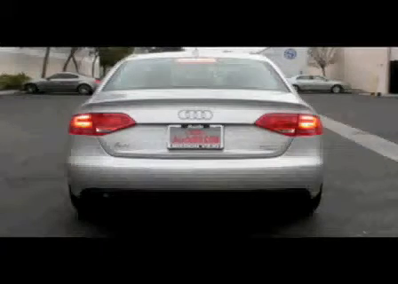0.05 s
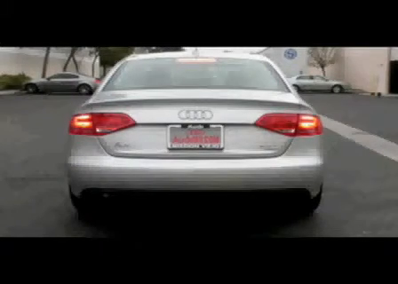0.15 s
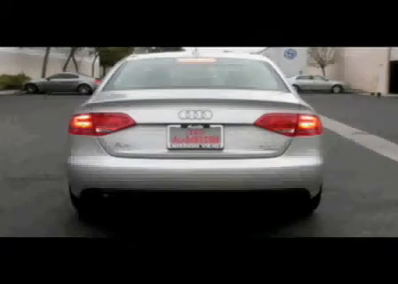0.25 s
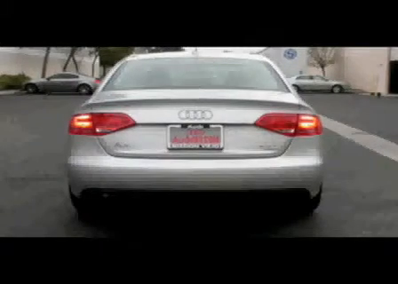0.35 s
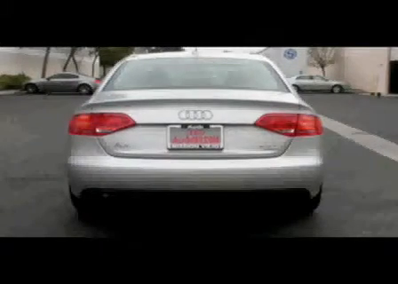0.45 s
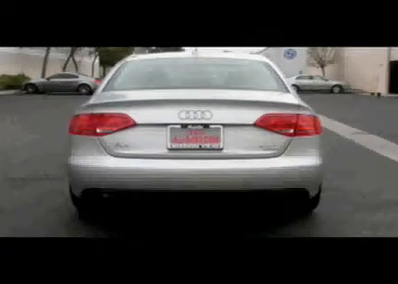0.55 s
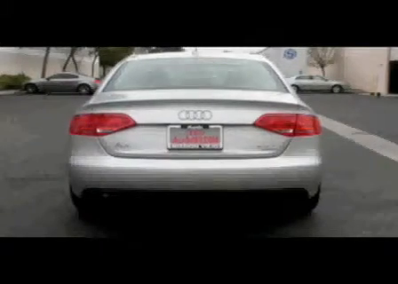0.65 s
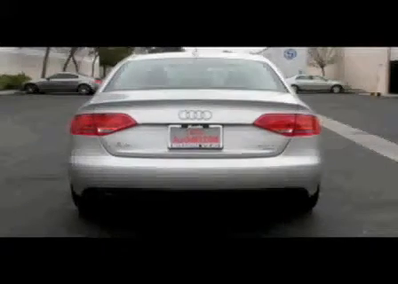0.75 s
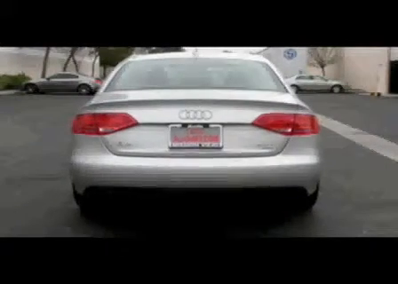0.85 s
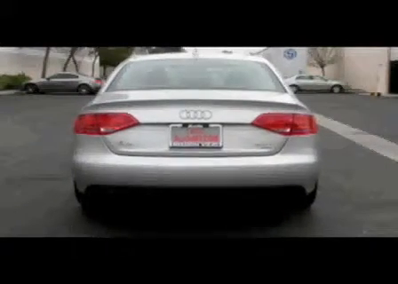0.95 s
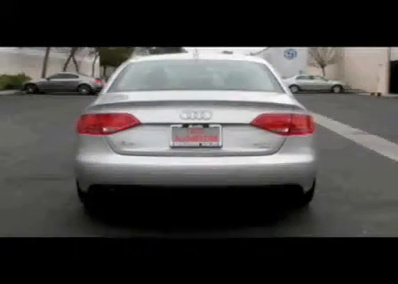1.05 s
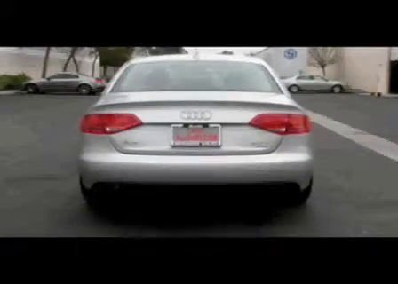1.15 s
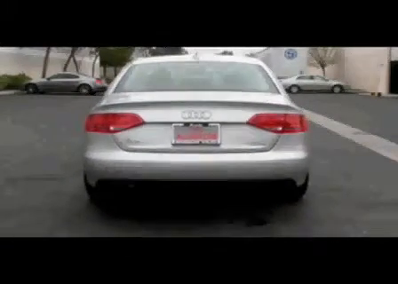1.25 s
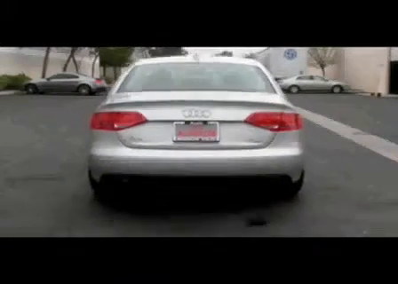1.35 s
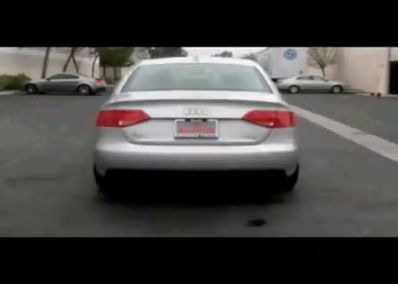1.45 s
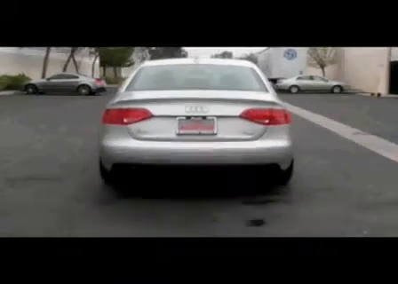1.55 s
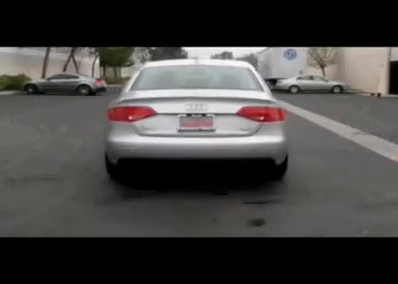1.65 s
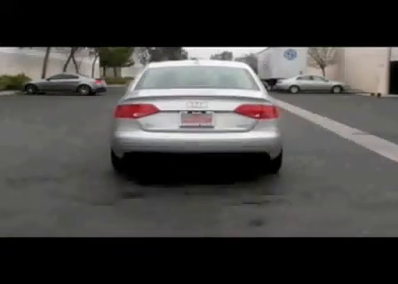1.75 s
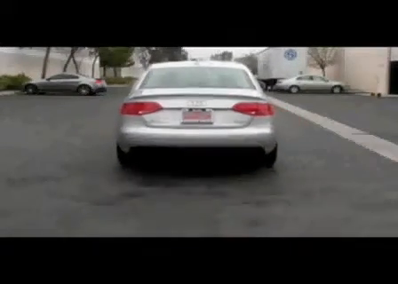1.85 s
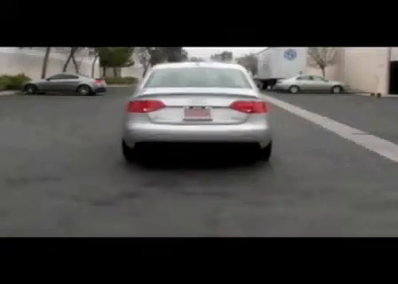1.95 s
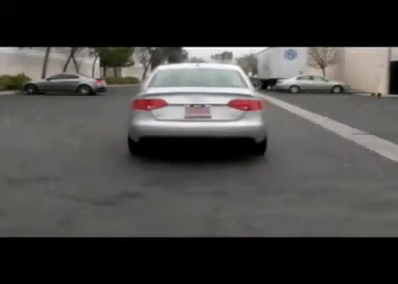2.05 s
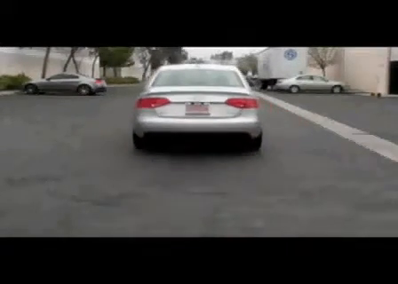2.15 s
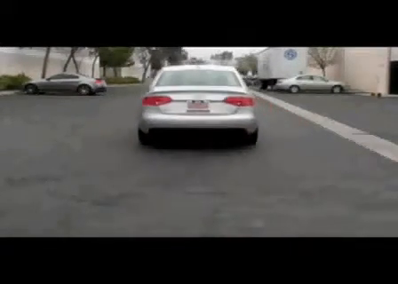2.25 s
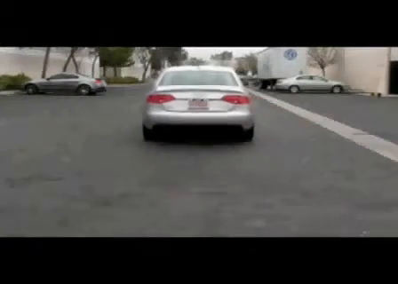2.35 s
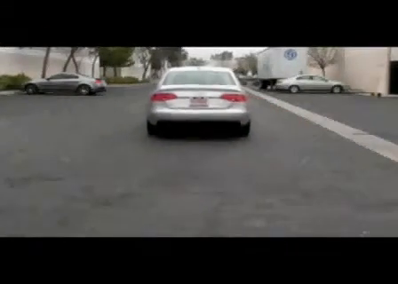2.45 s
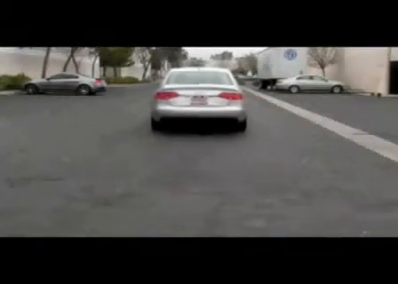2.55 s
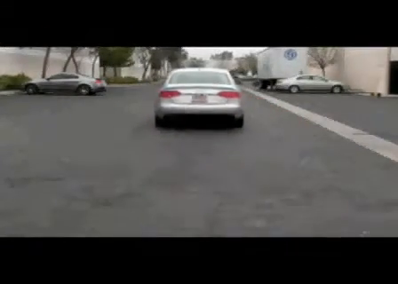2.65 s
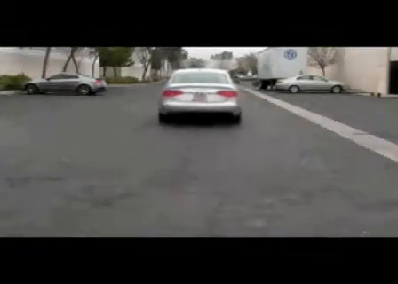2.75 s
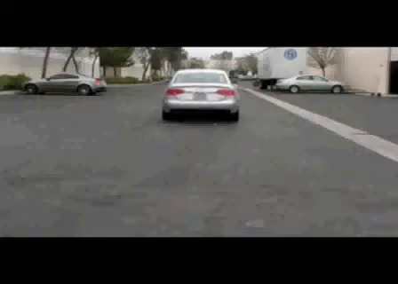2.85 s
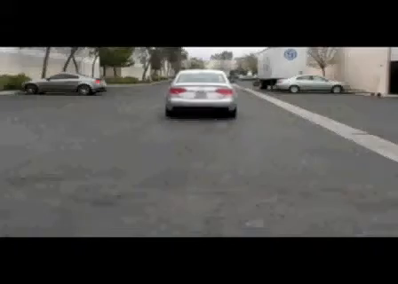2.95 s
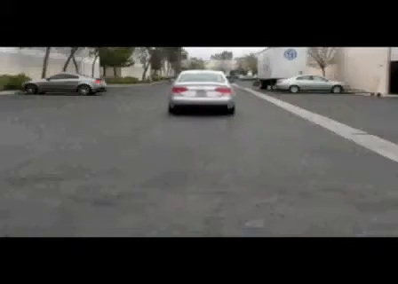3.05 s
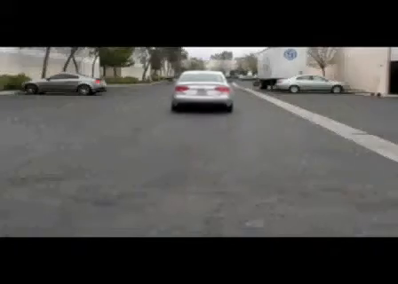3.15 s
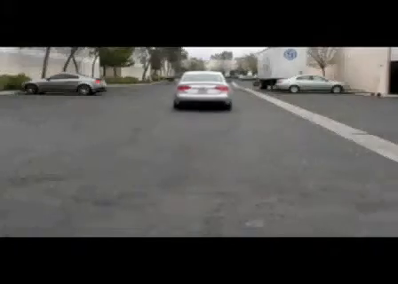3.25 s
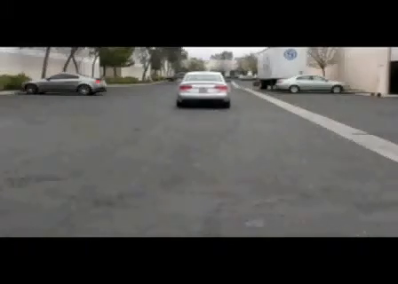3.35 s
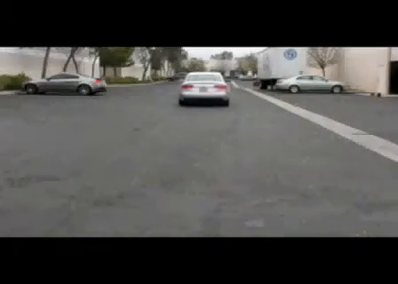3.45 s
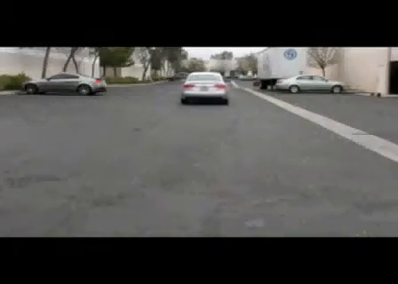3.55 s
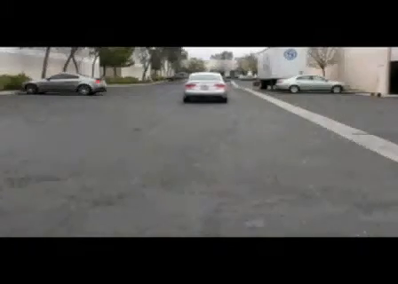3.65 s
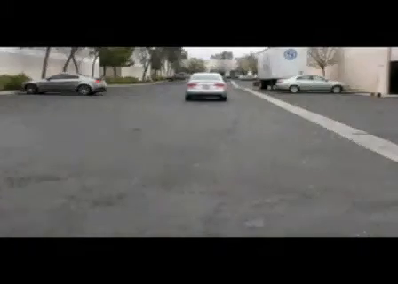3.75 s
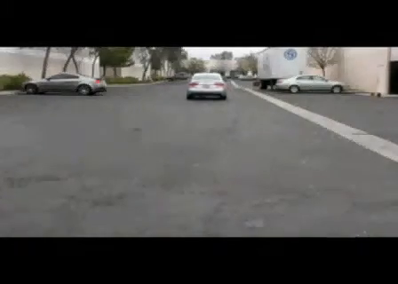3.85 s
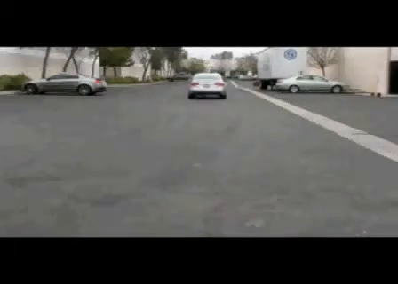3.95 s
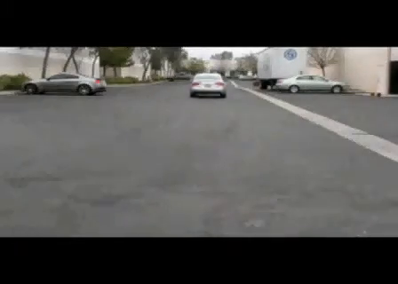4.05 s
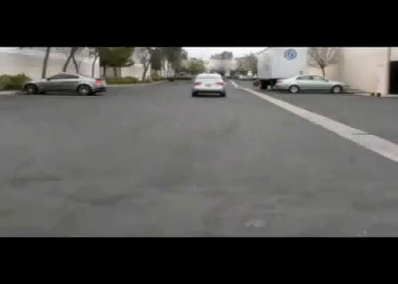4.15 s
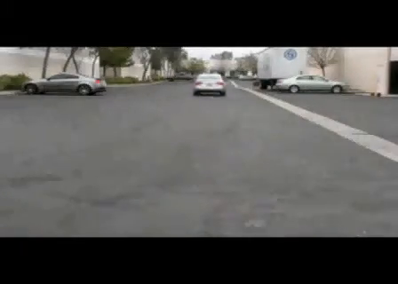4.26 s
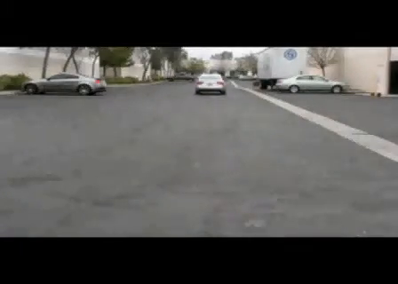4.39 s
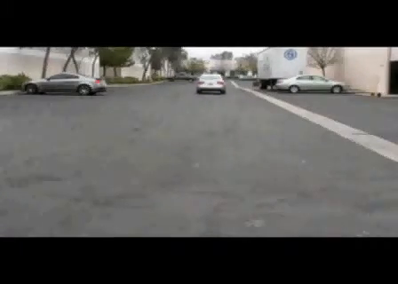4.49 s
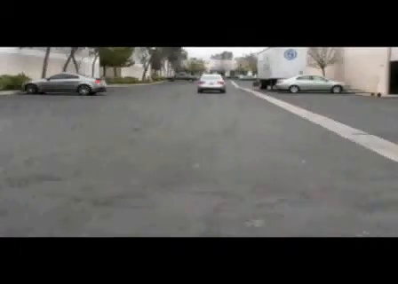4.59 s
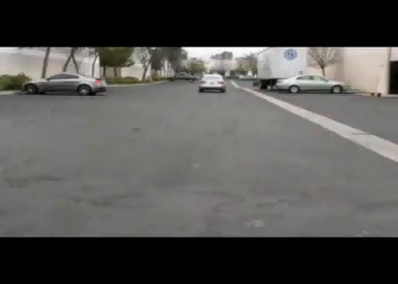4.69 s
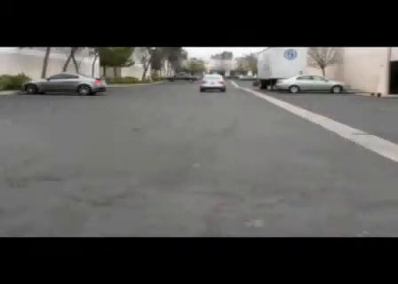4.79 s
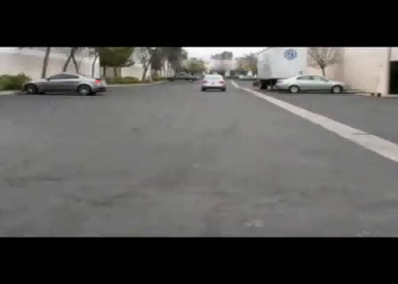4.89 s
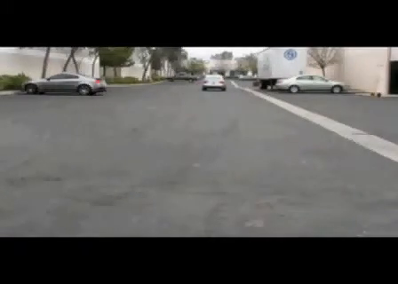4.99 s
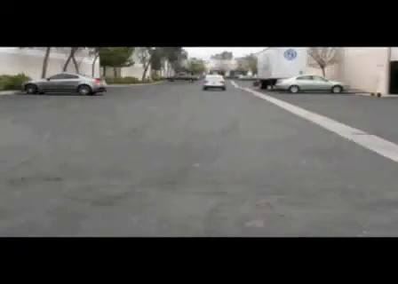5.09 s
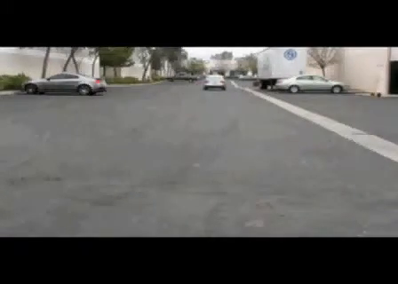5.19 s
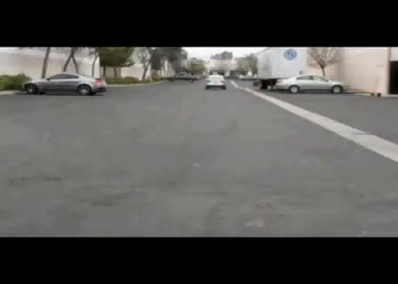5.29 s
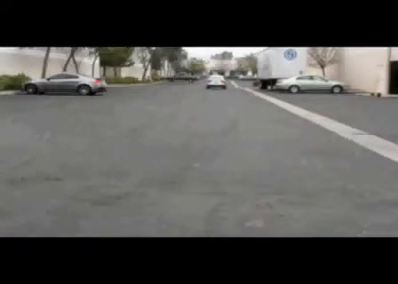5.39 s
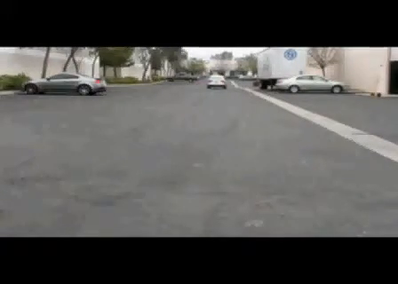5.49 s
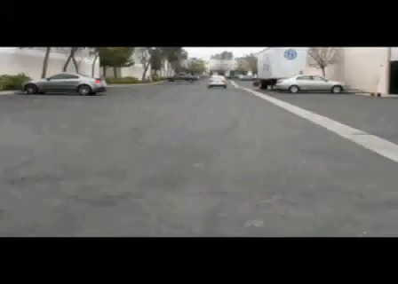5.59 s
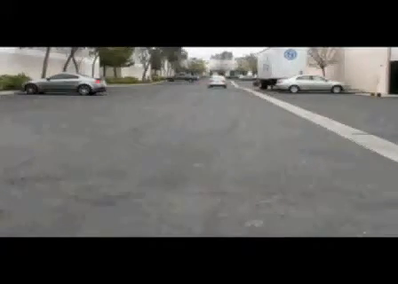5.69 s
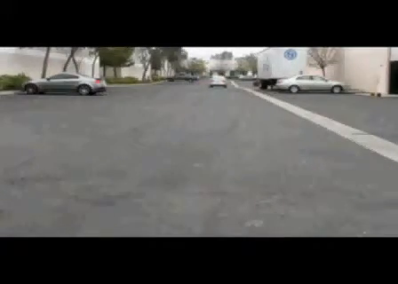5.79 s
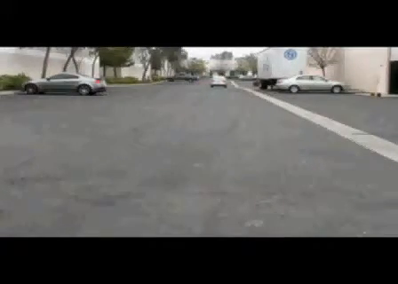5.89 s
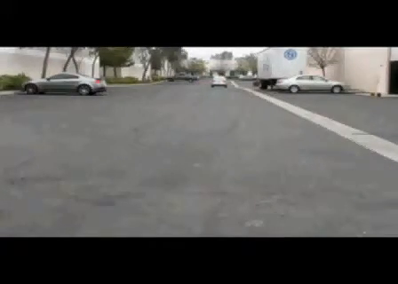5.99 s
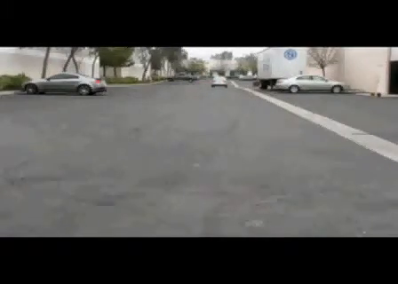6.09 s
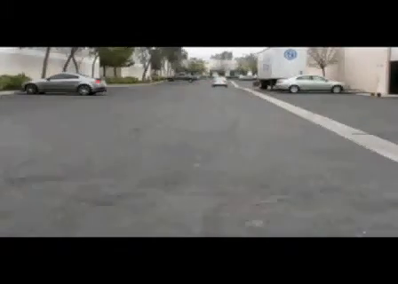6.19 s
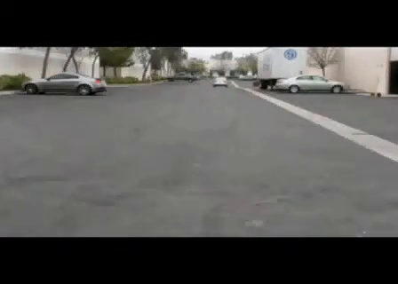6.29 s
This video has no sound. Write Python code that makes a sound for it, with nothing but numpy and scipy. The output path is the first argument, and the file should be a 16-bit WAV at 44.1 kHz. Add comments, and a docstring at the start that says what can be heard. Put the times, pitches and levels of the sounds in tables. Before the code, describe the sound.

Deep exhaust boom climbs from a soft idle to a loud drone, crackles at the gear change, then drops lower and fades away.

```python
"""Sports exhaust pulling away

A four-cylinder car idles just ahead, pulls away, burbles through an upshift and accelerates off down
a street between warehouses. Firing pulses boom as partials shaped by the tailpipe; noise in puffs is
exhaust gas, with a rasp each crank turn; even noise is tyre roll; a turbo whistles, unburnt fuel bangs,
walls return a diffuse echo. Rounding to coarse steps adds a gritty hiss."""
import sys
import numpy as np
from scipy import signal
from scipy.fft import rfft, irfft, next_fast_len
from scipy.io import wavfile

SR = 44100
rng = np.random.default_rng(int(sys.argv[2]) if len(sys.argv) > 2 else 0)


def persist_wave(psi):
    """Save psi, clipped to +-1, as 16-bit WAV."""
    counts = np.round(np.clip(psi, -1, 1) * 32767).astype(np.int16)
    wavfile.write(sys.argv[1], SR, np.atleast_2d(counts).T)


N = 279250
TIME = np.arange(N) / SR

# Engine speed at idle, lifting as the brake is let go. Each row: time in seconds, firing rate in Hz.
IDLE_FIRING_HZ = [(0, 27.63), (.48, 27.86), (.6, 31.37), (.66, 31.17)]
# Engine speed in first gear. Each row: time in seconds, firing rate in Hz.
FIRST_GEAR_FIRING_HZ = [(0.7, 42.8), (0.81, 52.5), (0.88, 58.1), (1.07, 64.43), (1.53, 75.47), (1.92, 90.9),
                        (2.31, 115.6), (2.83, 153.2), (3.3, 181.9), (3.73, 199.1), (3.87, 199.1)]
# Engine speed in second gear. Each row: time in seconds, firing rate in Hz.
SECOND_GEAR_FIRING_HZ = [(4.25, 125.4), (4.6, 137.9), (5.3, 149.6), (6.33, 167.6)]
# Firing pulse strength, throttle and distance together, before the pipe and trims.
# Each row: time in seconds, level in dB.
DRIVE_DB = [(0, -41), (.45, -37.5), (.55, -40), (.7, -34.5), (.95, -30.5), (1.65, -31), (2.35, -26),
            (2.6, -27), (2.97, -24), (3.12, -28.5), (3.7, -26.5), (4.15, -29.5), (4.27, -46), (4.55, -41.5),
            (4.83, -29.5), (5.35, -35), (6.02, -36.5), (6.33, -41)]
# What the pipe and muffler pass. Each row: frequency in Hz, gain in dB.
PIPE_DB = [(28, -10.5), (45, -6), (58, -3), (85, 0), (130, 0), (160, -3), (200, -7.5), (240, -5.5),
           (285, -9.5), (325, -12), (360, -12), (376, -14.5), (396, -21), (450, -16), (560, -25),
           (1000, -38)]
# Wall echoes cancel the firing note. Each row: time in seconds, gain change in dB, half length in seconds.
NULLS = [(3.138, -4, .02), (3.49, -12.5, .022), (3.642, -13, 0.019), (3.797, -20, .045),
         (3.974, -10.5, .017), (4.279, -9.5, .04), (5.199, -6, .05), (5.592, -17, 0.049),
         (5.891, -10, 0.046), (6.145, -10, 0.045)]
# Cylinder inequality: even at the launch, rough under load; before the upshift and lope trims.
# Each row: firing rate in Hz, half-order level in dB.
UNEVEN_DB = [(28, -27), (58, -28.5), (95, -19.5), (150, -14)]
# Overtone loss: pulses soften as the clutch bites, sharpen under load.
# Each row: firing rate in Hz, loss from one overtone to the next in dB.
OVERTONE_FALL_DB = [(28, 3), (52, 7), (72, 1.8), (110, 4.5)]
# Rush of gas and tyres, before trims and thresholds.
# Each row: time in seconds, roar level in dB, sharp hiss level in dB.
RUSH_DB = [(0, -64, -64.5), (.58, -63.5, -64.5), (.86, -50.5, -58), (1.27, -50, -57), (1.87, -43, -54),
           (2.22, -36, -49), (2.5, -34, -48), (3.0, -36.5, -47), (3.17, -38, -49), (3.84, -40, -49.5),
           (4.18, -42.5, -55), (4.42, -46.5, -57), (4.69, -42.5, -55.5), (6.02, -44, -53.5),
           (6.33, -46, -56.5)]
# Share of the rush from tyres and far walls. Each row: time in seconds, share 0-1.
FAR_SHARE = [(0, 0), (1.8, 0.22), (2.7, 0.19), (3.6, 0.62), (4.1, .5), (4.35, .9), (6.33, 0.96)]
# Gas roar spectrum. Each row: frequency in Hz, relative density in dB per Hz.
GAS_COLOUR = [(30, -28), (80, -12), (200, -1), (330, 2.5), (450, -1), (660, 1.5), (900, -2), (1250, -4),
              (1800, -11.5), (2600, -22), (5000, -43.5)]
# Sharp hiss spectrum. Each row: frequency in Hz, relative density in dB per Hz.
HISS_COLOUR = [(700, -26), (1500, -0.5), (2200, -2), (3500, -4), (5000, -11), (6500, -17), (8000, -20),
               (14000, -36)]
# Tyre roll spectrum. Each row: frequency in Hz, relative density in dB per Hz.
TYRE_COLOUR = [(30, -20.5), (80, -5.5), (200, -1), (350, -.5), (500, -3), (700, -1.5), (900, 2), (1150, -2),
               (1500, -5), (2000, -10), (3000, -22.5), (6000, -49)]
# Quiet street spectrum. Each row: frequency in Hz, relative density in dB per Hz.
STREET_COLOUR = [(30, 0.5), (120, -3), (300, -8.5), (1000, -15.5), (3000, -24.5), (12000, -39.5)]
# Sharp bangs in the pipe. Each row: time in seconds, push level in dB before the pipe-end high-pass.
POPS = [(2.213, -17), (3.920, -19), (3.941, -25.5), (4.12, -19.5), (4.132, -23.5), (4.161, -24),
        (4.174, -19.5), (4.219, -31.5), (4.325, -32)]

SHIFT_START_S, SHIFT_END_S = 3.94, 4.18  # the spark is held back between these
SHIFT_ATTACK_S, SHIFT_RELEASE_S = .012, .077
TURBO_PER_FIRING, TURBO_TOP_HZ = 53, 6080  # whistle cycles per firing; pitch at full boost
STEP, TOP_HZ = .0055, 15900  # rounding step in full-scale units; upper band limit


def undb(db):
    """Decibels to gain."""
    return np.exp(np.asarray(db) * (np.log(10) / 20))


def curves(table):
    """Each column of a timed table, sample by sample."""
    s, *columns = np.transpose(table)
    return [np.interp(TIME, s, column) for column in columns]


def unit(x):
    """Scale to rms 1."""
    return x / np.sqrt(np.mean(x ** 2))


def noise(colour):
    """Noise of rms 1 with a spectrum given in Hz and dB."""
    hz, db = np.transpose(colour)
    size = next_fast_len(N, True)
    bins_hz = np.maximum(np.arange(size // 2 + 1) * SR / size, 1)
    shape = undb(np.interp(np.log(bins_hz), np.log(hz), db))
    return unit(irfft(rfft(rng.standard_normal(size)) * shape, size)[:N])


def wander(rate_hz):
    """Random curve of rms 1 that glides to a new value twice a cycle of the given rate."""
    values = rng.standard_normal(size=8192)
    return unit(np.interp(TIME * 2 * rate_hz, np.arange(len(values)), values))


def bump(s, half_s):
    """A smooth bump of height 1 around a moment."""
    return np.exp(-((TIME - s) / half_s) ** 2)


def around(s):
    """The samples within 50 ms of a moment."""
    return slice(int((s - .05) * SR), int((s + .05) * SR))


def remoteness():
    """Share of the sound that has come a long way, 0-1."""
    return np.clip(curves(FAR_SHARE)[0], 0, 1)


def upshift():
    """How far the spark is held back, 0-1: a quick onset, a hold and a release."""
    onset = np.minimum(TIME - SHIFT_START_S, 0) / SHIFT_ATTACK_S
    release = np.maximum(TIME - SHIFT_END_S, 0) / SHIFT_RELEASE_S
    return np.exp(onset - release)


def pipe_db(hz):
    """Gain of the exhaust system at a frequency."""
    points_hz, db = np.transpose(PIPE_DB)
    return np.interp(np.log(hz), np.log(points_hz), db)


def pipe_lead(hz, mouth_hz=86, q=.7):
    """The open pipe radiates like a high-pass: low partials lead, so each puff swings up, down and up."""
    r = hz / mouth_hz
    return np.pi - np.arctan2(r / q, 1 - r ** 2)


def overtone_db(k, hz, third_db=-4, shift_db=8, rough_db=2.5):
    """Higher overtones are weaker; they roughen with the revs and rise when the spark comes late."""
    fall_db = (k - 3) * np.interp(hz, *np.transpose(OVERTONE_FALL_DB))
    return third_db - fall_db + shift_db * upshift() + rough_db * hz / hz.max() * wander(30)


def half_orders(hz, shift_db=11, lope_db=-11, shift_lope_db=1, fall_db=1, rough_db=2.5):
    """Unequal cylinders add lines halfway between the partials, raised in the upshift: (order, dB)."""
    held = upshift()
    db = np.interp(hz, *np.transpose(UNEVEN_DB)) + shift_db * held
    lines = [(.5, db + lope_db + shift_lope_db * held + rough_db * wander(15))]
    for k in range(1, 5):
        lines.append((k + .5, db - (k - 1) * fall_db + rough_db * wander(30)))
    return lines


def tailpipe(hz, turn, shift_db=4, far_db=-3, waver_db=.89, flutter_db=.8, octave_flutter_db=1.76,
             smear_rad=.9, cut_db=-3, misfire_db=-5, misfire_s=.015):
    """Firing pulses as a stack of partials that sweep through the resonances of the pipe."""
    far, held = remoteness(), upshift()
    # the steady note gives way during the upshift and when a charge bangs in the pipe instead
    misfires = np.max([bump(s, misfire_s) for s, _ in POPS], axis=0)
    drive_db = curves(DRIVE_DB)[0] + cut_db * held + misfire_db * misfires

    def partial(k, db):
        # far off, shifting wall echoes pull the upper partials out of step
        drift = smear_rad * far * min(k - 1, 2) * wander(4) if k > 1 else 0
        level = np.sqrt(2) * undb(drive_db + pipe_db(k * hz) + db)
        return level * np.cos(k * turn + pipe_lead(k * hz) + drift)

    echo_db = flutter_db * far * wander(9) + sum(db * bump(s, half_s) for s, db, half_s in NULLS)
    octave_db = shift_db * held + far * (far_db + octave_flutter_db * wander(8))
    tone = (partial(1, echo_db) + partial(2, octave_db)) * undb(waver_db * wander(25))
    for k in range(3, 12):
        tone += partial(k, overtone_db(k, hz) + far_db * far)
    for k, db in half_orders(hz):
        tone += partial(k, db)
    return tone


def rasp(turn, hz, centre_hz=630, octaves=.5, full_hz=105, flicker_hz=7):
    """The pipe rings each crank turn: closely packed, unsteady lines in one resonance, up with the revs."""
    out, pitch = np.zeros(N), np.log2(hz / centre_hz)
    for k in np.arange(6, 22) / 2:
        resonance = np.exp(-((pitch + np.log2(k)) / octaves) ** 2)
        out += resonance * wander(flicker_hz) * np.cos(k * turn + rng.uniform(0, 2 * np.pi))
    return out * np.minimum(hz / full_hz, 1)


def rush(turn, hz, gas_db=-1, tyre_db=1.5, rasp_db=-10, puff=.35, idle_puff=.9,
         flutter_db=1.08, surge_db=.81, roar_floor_db=-64, hiss_floor_db=-59):
    """Gas leaves in puffs, one a firing; with distance the even roll of the tyres takes over."""
    level_db, sharp_db = curves(RUSH_DB)
    far = remoteness()
    depth = puff + (idle_puff - puff) * (hz.min() / hz) ** 2  # slow puffs stand apart, fast ones merge
    puffs = (1 + depth * (1 - far) * np.cos(turn + .6)) * undb(flutter_db * wander(70))
    near_gain, far_gain = np.sqrt(1 - far) * unit(puffs), np.sqrt(far)

    roar = undb(gas_db) * near_gain * noise(GAS_COLOUR)
    roar += undb(tyre_db + surge_db * wander(5.4)) * far_gain * noise(TYRE_COLOUR)
    roar += undb(rasp_db) * np.sqrt(1 - far) * rasp(turn, hz)
    # roar and hiss need a fast flow: both die away below a threshold
    roar_gain = undb(level_db) / np.sqrt(1 + undb(2 * (roar_floor_db - level_db)))
    hiss_gain = undb(sharp_db) / np.sqrt(1 + undb(2 * (hiss_floor_db - sharp_db)) ** 2)
    return roar_gain * roar + hiss_gain * noise(HISS_COLOUR) * np.hypot(near_gain, far_gain)


def turbo(firing_hz, db=-26, far_db=-22, flicker_hz=330):
    """The turbo spools with the revs to full boost: a breathy whistle that follows the gas, mostly nearby."""
    whistle_hz = np.minimum(TURBO_PER_FIRING * firing_hz, TURBO_TOP_HZ)
    turn = 2 * np.pi * np.cumsum(whistle_hz) / SR
    gain = undb(curves(RUSH_DB)[0] + db + far_db * remoteness())
    return gain * (wander(flicker_hz) * np.cos(turn) + wander(flicker_hz) * np.sin(turn))


def walls(x, db=-19, t60_s=.6):
    """Warehouse fronts return a diffuse echo, stronger against the direct sound as the car recedes."""
    age = TIME[:SR]
    tail = rng.standard_normal(SR) * undb(-60 * age / t60_s) * (age > .03)
    return undb(db) * signal.fftconvolve(x * np.sqrt(remoteness()), tail / np.linalg.norm(tail))[:N]


def street(rms_db=-64.5):
    """The quiet street as steady coloured noise."""
    return undb(rms_db) * noise(STREET_COLOUR)


def bang(age, push_s=.00054, suck_s=.002, lag_s=.0034, suck=.57):
    """One slug of gas leaving the pipe: a sharp push and a longer suck."""
    return np.exp(-(age / push_s) ** 2) - suck * np.exp(-((age - lag_s) / suck_s) ** 2)


def pops(ring_s=.0097, crack_db=-17):
    """Unburnt fuel bangs in the pipe, each bang with a short crackle."""
    out, grit = np.zeros(N), noise(GAS_COLOUR)
    for s, db in POPS:
        near = around(s)
        age = TIME[near] - s
        crackle = grit[near] * (age > 0) * np.exp(-np.abs(age) / ring_s)
        out[near] += undb(db) * (bang(age) + undb(crack_db) * crackle)
    return out


def burble(turn, thump_db=-25.5, weak_db=-9, scatter_db=3, jitter_s=.0006):
    """In the upshift the spark comes late: firings thump unevenly in the pipe, every second one weaker."""
    held = upshift()
    fires = np.diff(np.floor(turn / (2 * np.pi))) > 0
    firings = np.flatnonzero(fires & (held[1:] > .05))
    out = np.zeros(N)
    for i, (size, late) in zip(firings, rng.standard_normal(size=(200, 2))):
        near = around(TIME[i])
        second = round(turn[i] / (2 * np.pi)) % 2
        level_db = thump_db + weak_db * second + scatter_db * size
        out[near] += held[i] * undb(level_db) * bang(TIME[near] - TIME[i] - jitter_s * late)
    return out


def mouth(x, cut_hz=58):
    """The narrow pipe end hardly radiates the deepest bass."""
    return signal.sosfilt(signal.butter(2, cut_hz, "high", fs=SR, output="sos"), x)


def scene():
    """The car, its echo and the quiet street."""
    hz, = curves(IDLE_FIRING_HZ + FIRST_GEAR_FIRING_HZ + SECOND_GEAR_FIRING_HZ)
    turn = 2 * np.pi * np.cumsum(hz) / SR  # one turn of phase per firing
    car = tailpipe(hz, turn) + rush(turn, hz) + turbo(hz) + mouth(pops() + burble(turn))
    return (car + walls(car) + street())[None]


def record(dry, bias=-.0005, dull=.036):
    """Coarse rounding: grit on each idle pulse, an even hiss once loud; then a slight dulling and band limit."""
    stepped = STEP * np.round((dry + bias) / STEP)
    soft = signal.lfilter([1 - dull], [1, -dull], stepped)
    return signal.sosfilt(signal.ellip(10, .2, 70, TOP_HZ, fs=SR, output="sos"), soft)


dry = scene()
out = record(dry)
persist_wave(out)
```